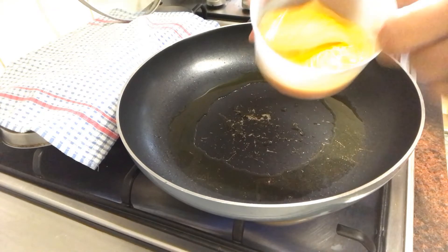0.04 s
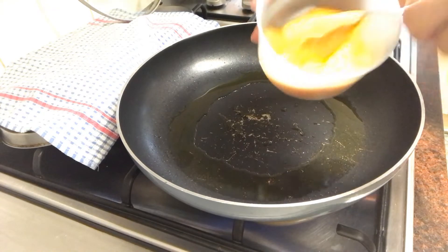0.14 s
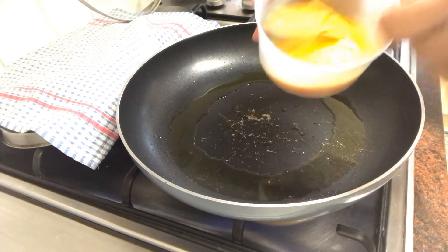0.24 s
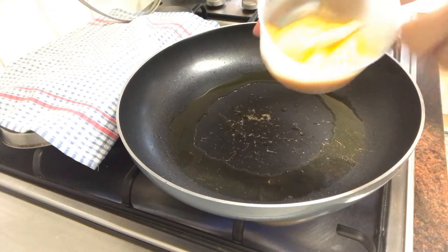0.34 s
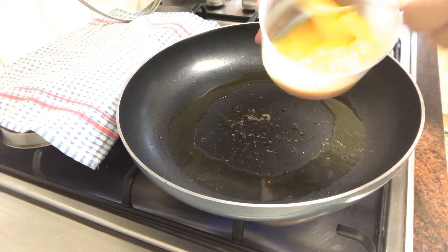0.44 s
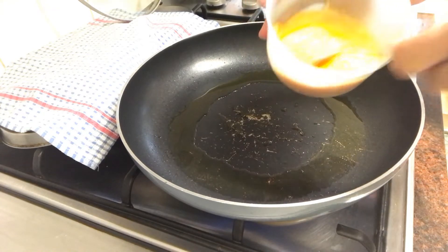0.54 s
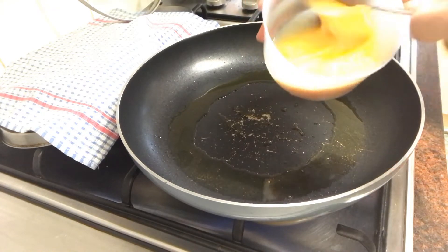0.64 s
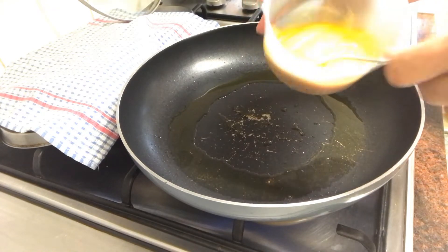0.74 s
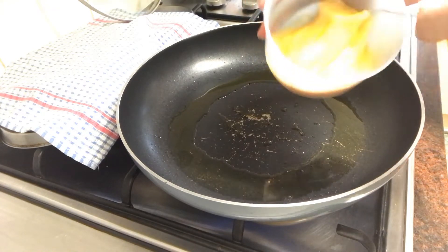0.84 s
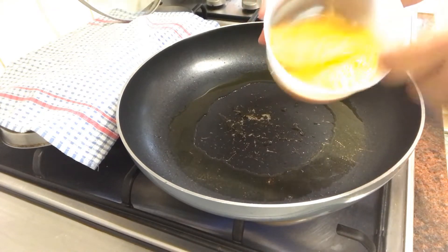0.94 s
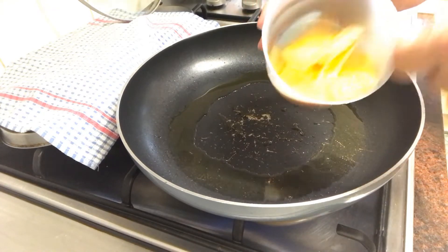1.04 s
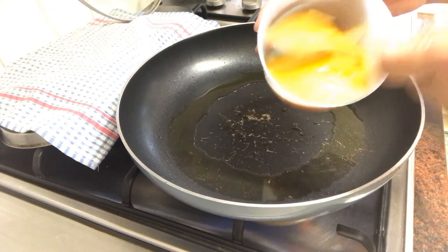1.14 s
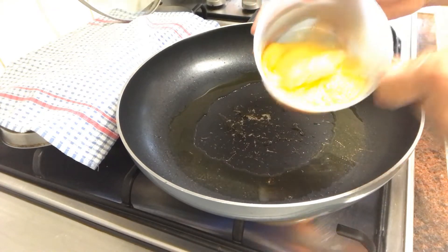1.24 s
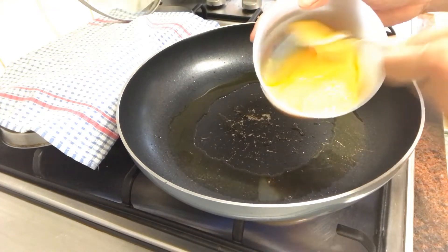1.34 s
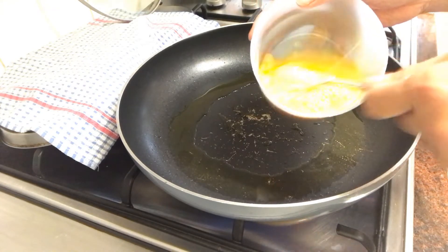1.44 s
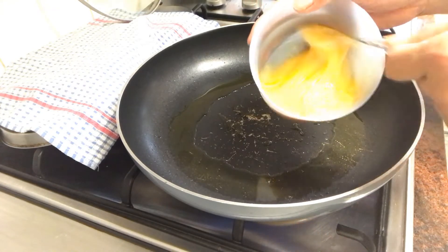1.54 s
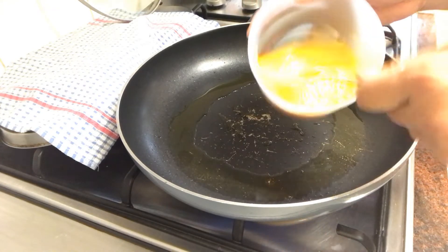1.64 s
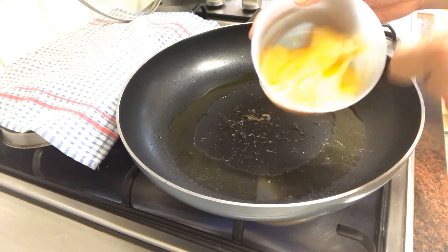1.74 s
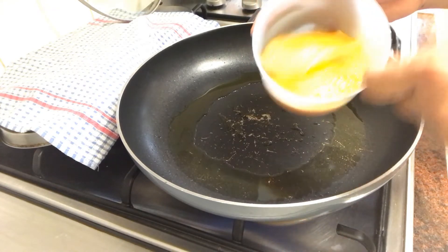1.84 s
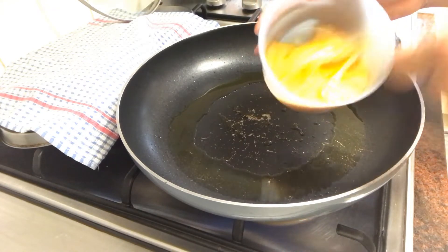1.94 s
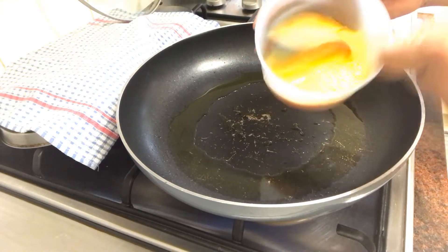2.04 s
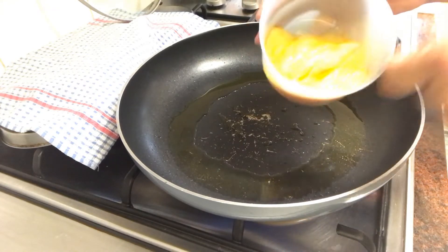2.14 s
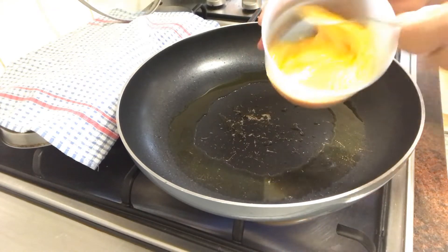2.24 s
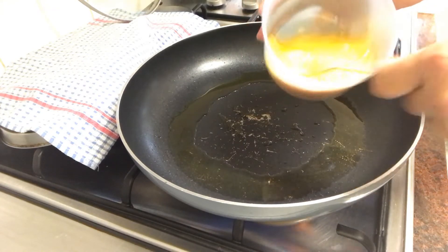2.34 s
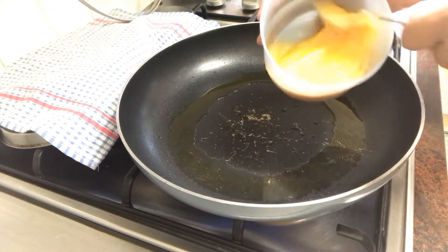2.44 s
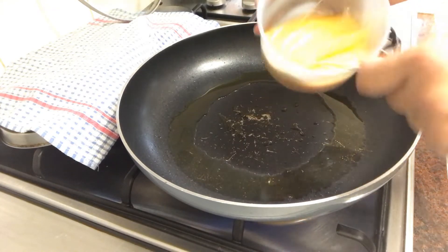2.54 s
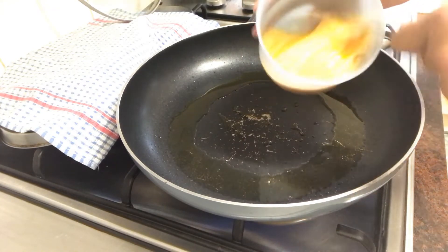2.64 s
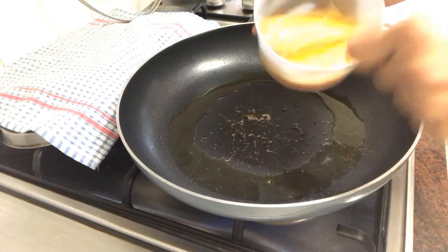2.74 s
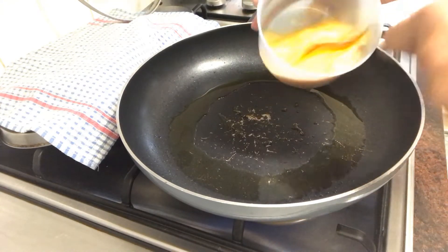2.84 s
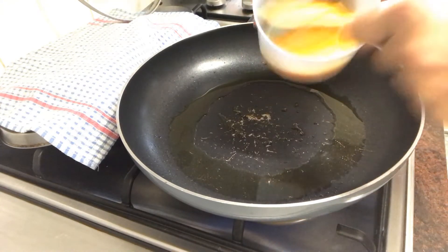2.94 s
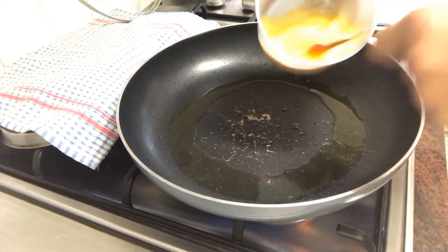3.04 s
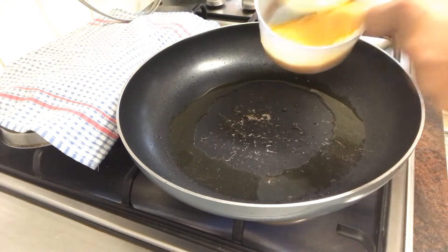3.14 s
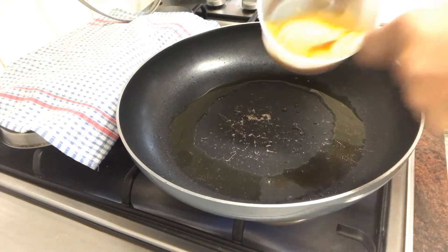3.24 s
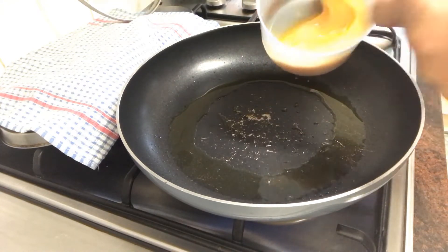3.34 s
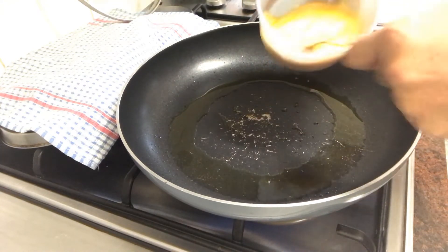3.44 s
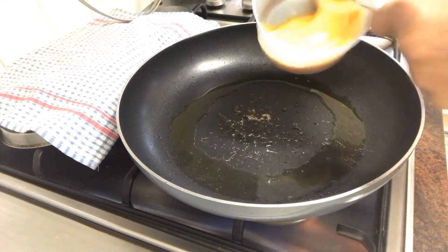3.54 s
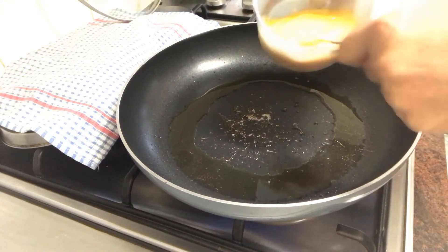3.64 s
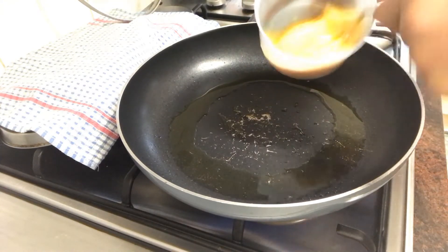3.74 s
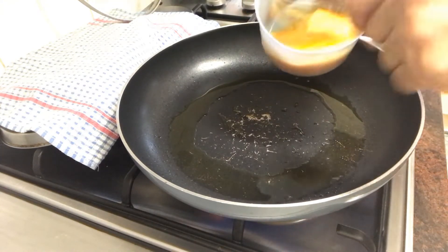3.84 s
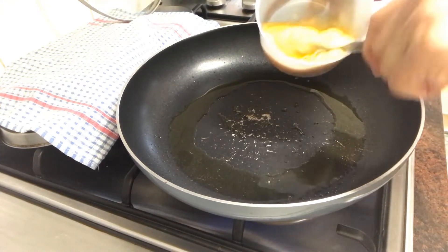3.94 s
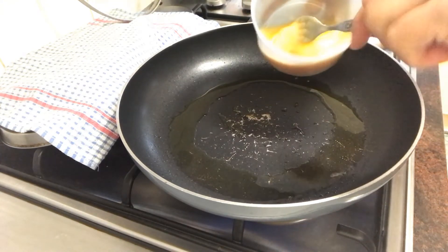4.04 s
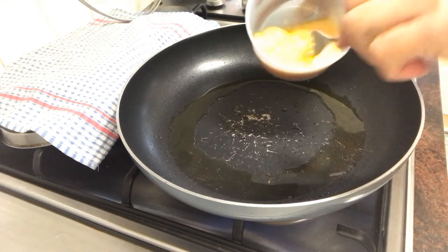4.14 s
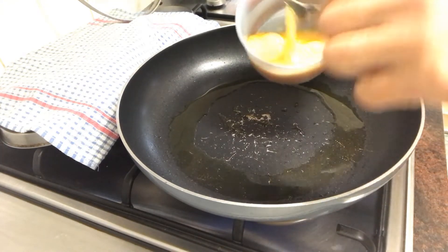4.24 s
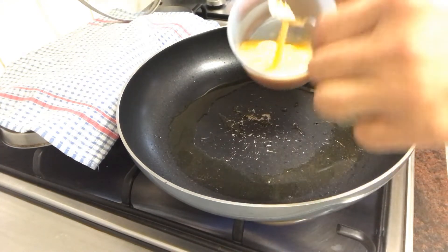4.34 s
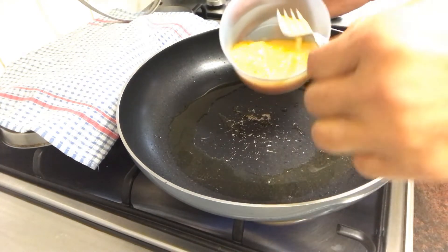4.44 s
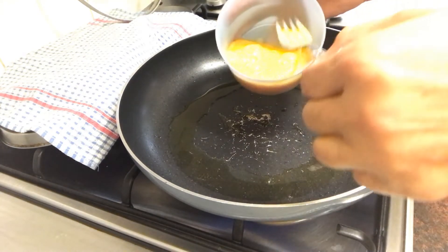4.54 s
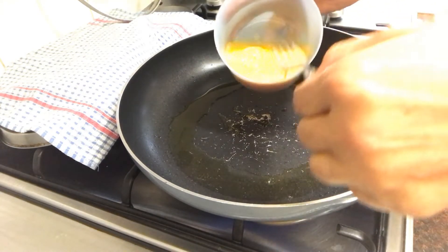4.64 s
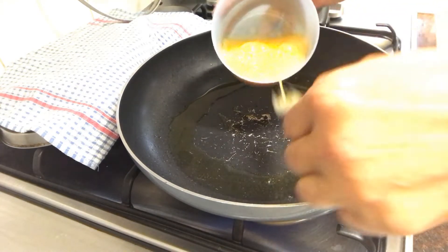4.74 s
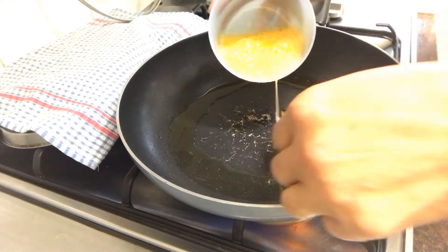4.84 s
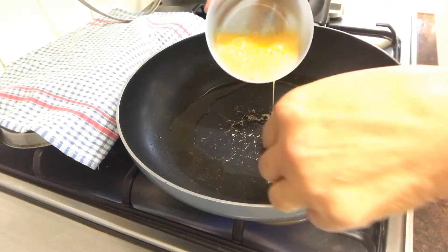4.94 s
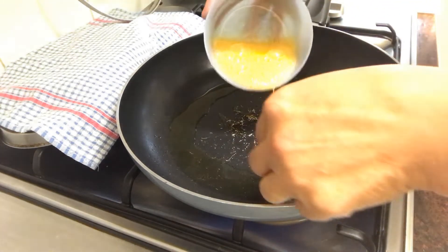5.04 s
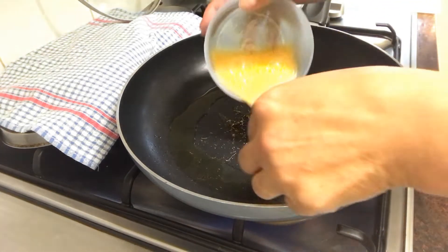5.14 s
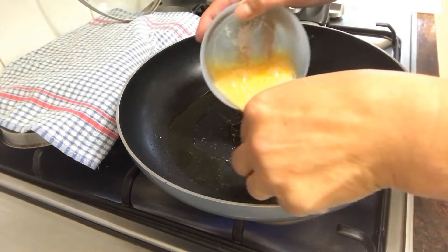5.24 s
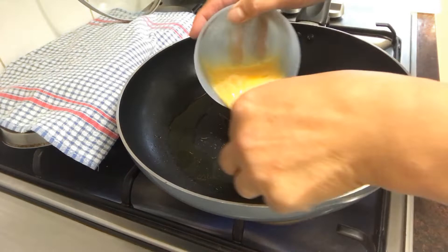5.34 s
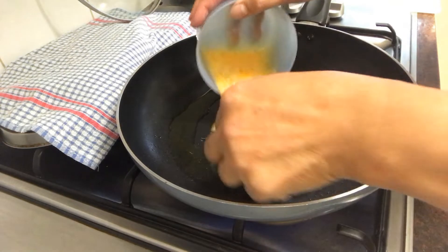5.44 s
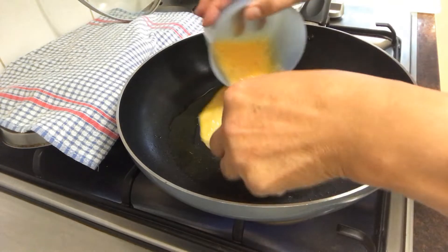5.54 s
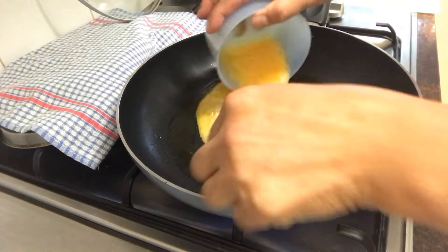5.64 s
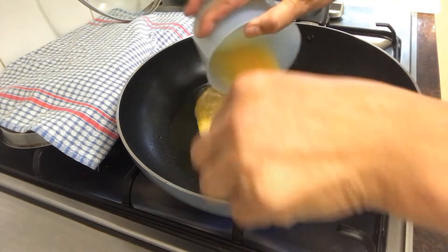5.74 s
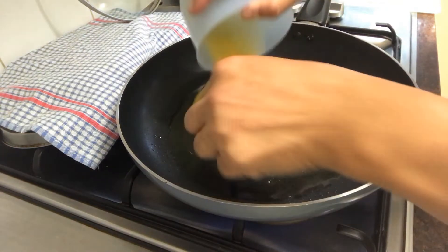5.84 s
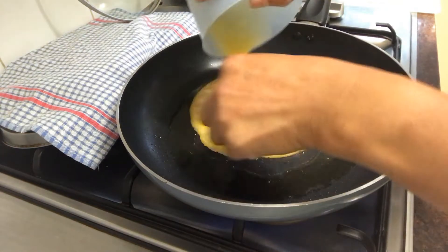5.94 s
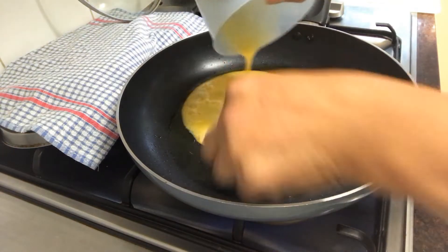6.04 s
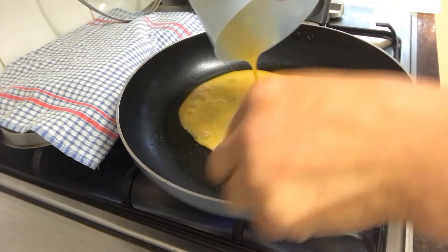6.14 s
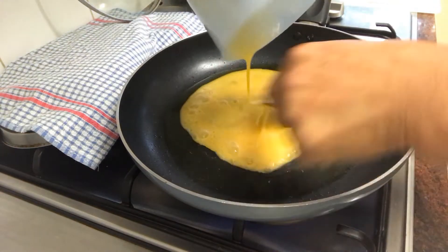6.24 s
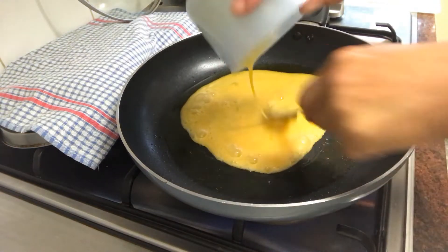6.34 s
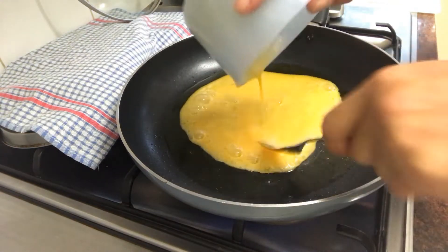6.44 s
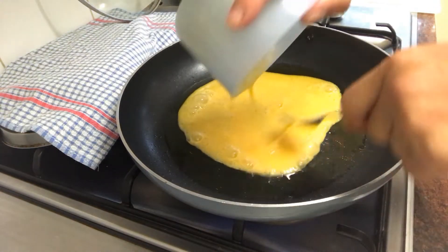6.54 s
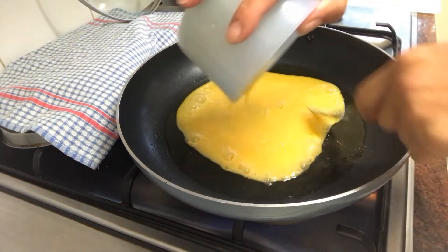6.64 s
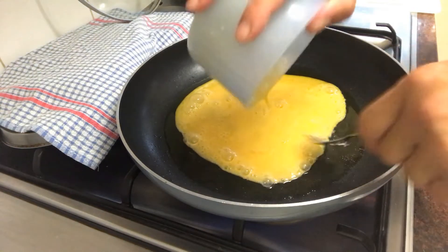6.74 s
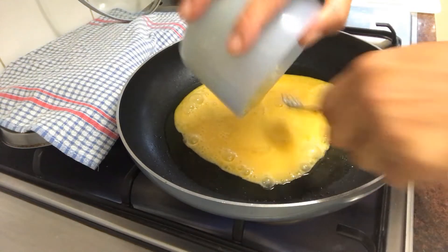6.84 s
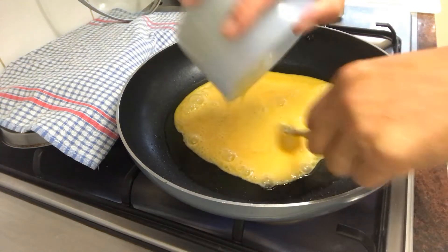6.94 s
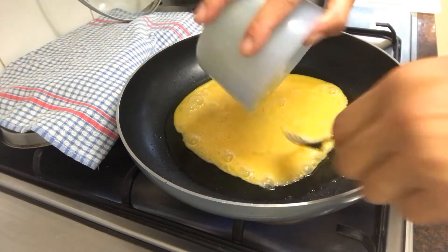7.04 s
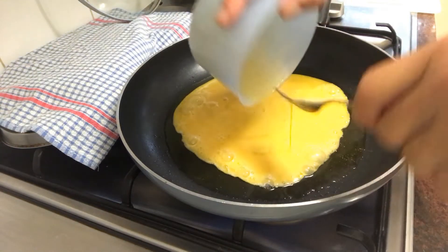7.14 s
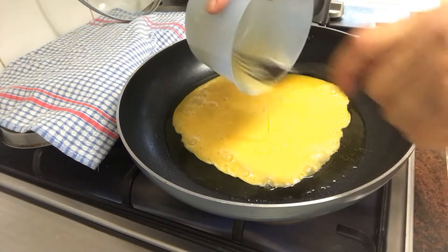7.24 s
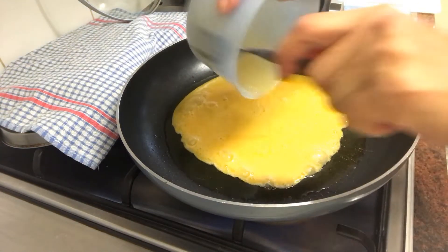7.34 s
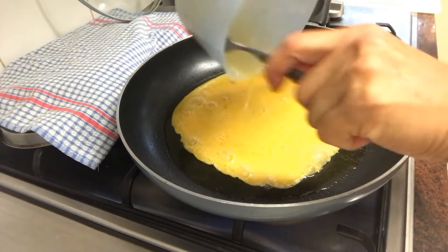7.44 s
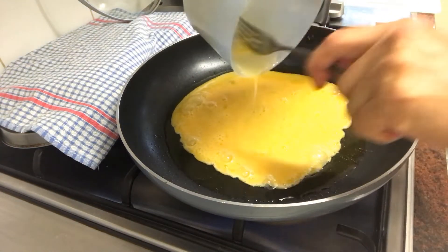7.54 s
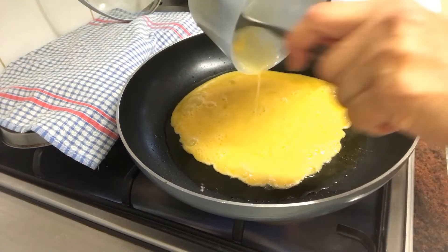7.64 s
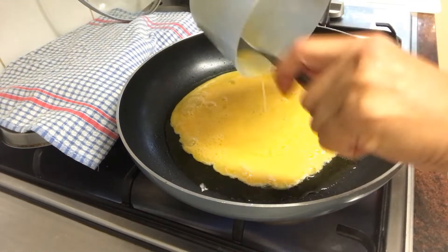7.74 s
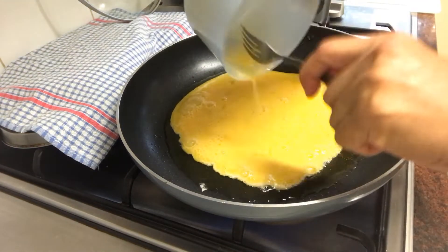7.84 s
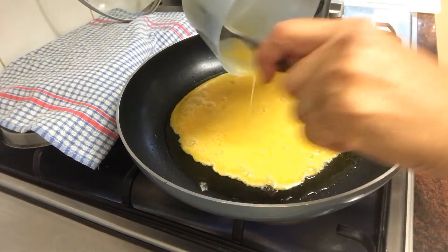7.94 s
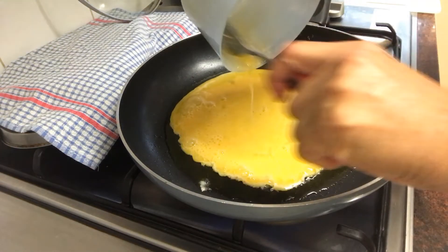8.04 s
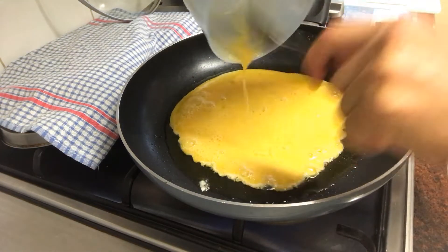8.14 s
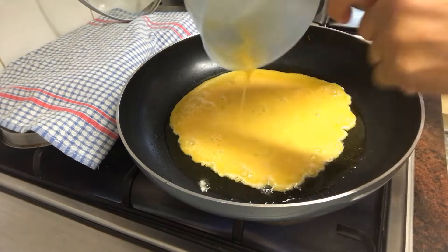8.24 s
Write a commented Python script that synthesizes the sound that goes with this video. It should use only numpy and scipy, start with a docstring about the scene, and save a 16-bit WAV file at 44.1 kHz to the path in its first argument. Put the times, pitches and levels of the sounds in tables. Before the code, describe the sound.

Brisk wet fork whisking knocks a small bowl for four seconds, a pause, then egg sputters in a hot pan, ending with bowl scrapes.

```python
"""A fork beats eggs in a thin bowl close to the microphone: noise slips, ringing wall modes and short gliding tones
make its knocks, scrapes and slosh, stroke by stroke.
A drip, then the whole egg, meets hot oil in a pan: random bubble rings, spits and whistles make the sizzle.
At last the fork scrapes the bowl out. A small kitchen answers with decaying noise echoes;
the gas flame and the house murmur below as soft coloured noise."""
import sys
import numpy as np
from scipy import signal
from scipy.fft import rfft, irfft
from scipy.io import wavfile

SR = 44100
rng = np.random.default_rng(int(sys.argv[2]) if len(sys.argv) > 2 else 0)


def put_to_file(sound):
    """Save the sound as 16-bit audio at rate SR, in the file named by the first command-line argument."""
    columns = np.atleast_2d(sound).T  # one column per channel
    safe = np.clip(columns, -1, 1)
    whole_steps = np.round(safe * 32767)
    wavfile.write(sys.argv[1], SR, whole_steps.astype(np.int16))


N = 365148   # samples

# modes of the bowl wall: pitch_hz, relative level_db, t60_s (stretched a little under sloshing egg)
BOWL_WALL = [(203.7, 2.5, 0.009), (333, -9.5, 0.0091), (627, -11.5, 0.025), (792, -8.5, 0.039),
             (939, -7, 0.05), (1120, -2.5, 0.026), (1550, 0, 0.014), (1830, -12.5, 0.025),
             (2110, -14, 0.035), (2390, -12.5, 0.053), (3000, -13.5, 0.048), (3330, -16, 0.034),
             (3620, -9.5, 0.04), (4300, -2.5, 0.011), (4700, -9.5, 0.01), (5324, -13, 0.04),
             (6090, -1.5, 0.0075), (6820, -3.5, 0.0082), (9130, -14.5, 0.018)]
# colour of tines dragging on the wall: frequency_hz, gain_db
SCRAPE_COLOUR = [(710, -27), (1200, 0), (1590, -20), (1870, -16), (2510, -5.5), (3180, -14), (6100, -11.5),
                 (7910, -22), (16000, -29.5)]
# a drip, then the pour, fry in the oil: time_s, small_bubbles_db, middle_bubbles_db, hiss_db (before mixing trims)
FRYING_LEVELS = [(4.96, -79, -84, -77), (5.012, -43.5, -58, -55), (5.25, -57.5, -61, -64.5),
                 (5.355, -56.5, -60, -70), (5.4, -33.5, -41, -50.5), (5.47, -27.5, -32, -48.5),
                 (5.66, -27.5, -31, -48.5), (5.82, -40, -32.5, -52.5), (5.99, -35, -35, -51),
                 (6.14, -43, -44.5, -56.5), (6.29, -35, -36, -47), (6.49, -32, -46, -58),
                 (6.82, -42.5, -50.5, -67.5), (7.1, -47, -50, -68.5), (7.6, -51.5, -54.5, -62.5),
                 (7.8, -46.5, -53, -59.5), (7.93, -63, -53.5, -67.5), (8.09, -46.5, -56, -62.5),
                 (8.28, -74, -53, -68.5)]
COMMON_HZ = 3400   # usual pitch of the commonest bubble


def amp(db):
    """Decibels to a linear factor."""
    return 10 ** (np.asarray(db) / 20)


def rms_one(x):
    """Scale to an rms of 1."""
    return x / np.sqrt(np.mean(x ** 2) + 1e-20)


def in_time(rows):
    """Columns joined by straight lines; silence before the first row."""
    s, *columns = np.transpose(rows)
    return [np.interp(np.arange(N) / SR, s, column, left=-200) for column in columns]


def colour(x, points):
    """Causal minimum-phase filter whose gain follows a table of frequency_hz, gain_db."""
    hz, db = np.transpose(points)
    grid = np.linspace(1, SR / 2, 1025)
    gain_db = np.interp(np.log(grid), np.log(hz), np.maximum(db, -70))
    cepstrum = irfft(gain_db * np.log(10) / 20)
    cepstrum[1:1024] *= 2      # folding the cepstrum gives minimum phase
    cepstrum[1025:] = 0
    impulse = irfft(np.exp(rfft(cepstrum)))
    return signal.oaconvolve(x, impulse)[:N]


def band(x, low_hz, high_hz, order=2):
    """Butterworth band-pass."""
    return signal.sosfilt(signal.butter(order, [low_hz, high_hz], "band", fs=SR, output="sos"), x)


def drift(rate):
    """Slow random wander of rms 1, made at SR / 40 and joined up; a higher rate (Hz) wanders faster."""
    r = np.exp(-80 * np.pi * rate / SR)
    noise = rng.standard_normal(N // 40 + 2002)
    slow = signal.lfilter([1], [1, -2 * r, r * r], noise)[2000:]   # drop the settling
    return np.interp(np.arange(N) / 40, np.arange(len(slow)), rms_one(slow))


def ring(clicks, hz, t60):
    """Two-pole resonance: a unit click sets a dying sine of height 1 ringing."""
    r, w = amp(-60 / (t60 * SR)), 2 * np.pi * hz / SR
    return signal.lfilter([0, np.sin(w)], [1, -2 * r * np.cos(w), r * r], clicks + 1e-18)


def grains(per_s, spread_db):
    """Random clicks of either sign, their sizes spread exponentially in dB."""
    sizes = amp(spread_db * np.minimum(rng.exponential(1, N), 5)) * rng.choice([-1, 1], N)
    return sizes * (rng.random(N) < per_s / SR)


def blips(rows, t60, rise_s, glide):
    """Short dying tones (time_s, level_db, pitch_hz), each gliding up as its pocket of air shrinks."""
    t = np.arange(SR // 20) / SR
    out = np.zeros(N + len(t))
    shape = (1 - np.exp(-t / rise_s)) * amp(-60 * t / t60)
    for s, db, hz in rows:
        at = round(s * SR)
        out[at:at + len(t)] += amp(db) * shape * np.sin(2 * np.pi * hz * t * (1 + glide * t))
    return out[:N]


def sing(x, hz, width_hz):
    """Resonance with a moving centre: shift down by the centre, low-pass twice, shift back; rms 1."""
    turn = np.exp(2j * np.pi * np.cumsum(hz) / SR)
    r = np.exp(-np.pi * width_hz / SR)
    return rms_one(np.real(turn * signal.lfilter([1], [1, -2 * r, r * r], x / turn)))


def dying_noise(clicks, noise, t60):
    """Each click opens a burst of noise that dies away exponentially."""
    envelope = signal.lfilter([1], [1, -amp(-60 / (t60 * SR))], clicks + 1e-18)
    return envelope * noise


def murmur():
    """Flame and house: soft noise whose bass comes in lumps."""
    # frequency_hz, gain_db
    murmur_colour = [(15, -45), (25, -29), (43, -12), (71, -6), (133, -13.5), (183, -14.5), (240, -19),
                     (389, -20.5), (440, -23.5), (520, -22), (1140, -20.5), (1530, -29), (7000, -37),
                     (9000, -42.5), (15500, -41)]
    noise = rms_one(colour(rng.standard_normal(N), murmur_colour))
    bass = signal.lfilter(*signal.butter(1, 200, fs=SR), noise)
    return amp(-64) * (noise - bass + amp(1.9 * drift(4.8)) * bass)


def sweep():
    """Slosh, scrape and squeak in dB and squelch pitch in Hz, shaped by how each stroke lands, slops and lifts."""
    # strokes along the wall: start_s, contact_s, egg_slops_after_s, slosh_db, scrape_db (before mixing trims),
    # squeak_on_landing_db, squelch_at_start_hz, squelch_at_slop_hz
    stroke_rows = [(0, 0.046, 0.0042, -34, -40.5, -1, 3700, 3600),
                   (.131, 0.087, .05, -23.5, -30.5, 1, 2600, 2000),
                   (0.302, 0.15, 0.076, -20, -27, 9.5, 4300, 2950),
                   (0.554, 0.096, 0.073, -24.5, -31, 0, 3100, 2450),
                   (0.745, 0.15, 0.042, -22.5, -29.5, 8, 3940, 2750),
                   (0.98, .11, 0.065, -25.5, -33, 15, 4560, 3100),
                   (1.118, 0.0062, 0.0076, -22, -33, 4, 3930, 3500),
                   (1.204, 0.2, 0.084, -25, -34.5, 20.5, 4500, 2330),
                   (1.427, .19, 0.092, -26, -31.5, 12, 4340, 2380),
                   (1.654, 0.18, 0.1, -25.5, -30.5, 5, 4300, 2800),
                   (1.911, .11, 0.069, -24, -27, -15, 3500, 2700),
                   (2.121, 0.15, 0.079, -23, -29, 10.5, 3300, 3000),
                   (2.336, 0.16, .08, -18.5, -30, -2, 4880, 2410),
                   (2.565, .13, 0.053, -17, -31, 5, 3100, 2600),
                   (2.787, 0.12, 0.074, -22, -29, -4, 5050, 2420),
                   (3.012, 0.1, 0.069, -16.5, -29, -2.5, 4850, 2620),
                   (3.25, 0.11, 0.049, -18, -30, -1.5, 3370, 2300),
                   (3.449, 0.11, 0.078, -18.5, -29.5, -1, 4470, 2470),
                   (3.675, 0.089, .06, -16, -28.5, -0.5, 3370, 2850),
                   (3.94, 0.0068, 0.0067, -16, -34.5, 4.5, 3400, 2600),
                   (7.365, 0.044, 0.1, -22, -37, 3, 4020, 3000),
                   (7.468, 0.064, .03, -32, -36, 7, 3900, 3400),
                   (7.702, 0.0058, 0.0056, -23, -34, 0, 4700, 4600),
                   (7.764, 0.038, 0.0076, -23.5, -33, 4, 3000, 2830),
                   (7.982, 0.022, .005, -33, -39, 0, 3620, 3600),
                   (8.04, 0.084, 0.077, -32, -37.5, 15, 3120, 3070)]
    attack_s, bite_db, bite_s = 0.0033, 11, 0.011   # the tines land fast and bite harder at first
    drag_db_per_s, lift_db_per_s = 29.5, 328        # the scrape eases in contact, dies after the lift
    # the slosh swells to the slop, ebbs, drains after the lift
    swell_db_per_s, ebb_db_per_s, drain_db_per_s = 200.5, 135, 306
    drip_db, drip_db_per_s = -20, 108.5             # egg runs back down the wall, this far under the slosh
    squeak_s = 0.05                                 # the squelch stands out while the tines dig in
    gulp_db, gulp_s = 3.5, 0.02                     # and again as the egg slops
    lift_hz = 3500.                                 # the squelch returns to this as the fork leaves

    slosh_db, scrape_db = np.full((2, N), -200.)
    squeak_db, sing_hz = np.zeros(N), np.full(N, lift_hz)
    for start_s, contact_s, slop_s, top_db, drag_db, dig_db, first_hz, slop_hz in stroke_rows:
        start = round(start_s * SR)
        at = slice(start, min(start + SR // 2, N))
        t = np.arange(at.stop - at.start) / SR
        landing_db = 20 * np.log10(np.minimum(t / attack_s, 1) + 1e-9)
        lifted_s = np.maximum(t - contact_s, 0)
        scrape = drag_db + bite_db * np.exp(-t / bite_s) - drag_db_per_s * t - lift_db_per_s * lifted_s
        fall_db = np.maximum(swell_db_per_s * (slop_s - t), ebb_db_per_s * (t - slop_s))
        slosh = top_db - fall_db - drain_db_per_s * lifted_s
        slosh = np.maximum(slosh, top_db + drip_db - drip_db_per_s * np.abs(t - contact_s))
        scrape_db[at] = np.maximum(scrape_db[at], scrape + landing_db)
        slosh_db[at] = np.maximum(slosh_db[at], slosh + landing_db)
        dig = dig_db * np.exp(-(t / squeak_s) ** 2)
        squeak_db[at] = dig + gulp_db * np.exp(-((t - slop_s) / gulp_s) ** 2)
        turns_s = [0, slop_s / 4, slop_s, max(contact_s, slop_s) + 0.033]
        sing_hz[at] = np.interp(t, turns_s, [first_hz, first_hz, slop_hz, lift_hz])
    return slosh_db, scrape_db, squeak_db, sing_hz


def strokes(slosh_db, scrape_db, squeak_db, sing_hz):
    """Dense slips of the tines hiss and sing with the wet spot; sloshing egg shakes the low modes and pops."""
    # pockets of air pop in the egg: time_s, level_db, pitch_hz
    pop_rows = [(0.1596, -15, 1820), (0.1838, -18, 2990), (0.2503, -26.5, 1540), (0.408, -21.5, 1900),
                (0.6344, -17.5, 2120), (0.854, -26, 3540), (1.3029, -22, 2300), (1.3159, -14, 2050),
                (1.365, -22, 3100), (1.54, -14.5, 2300), (1.5544, -22, 1620), (1.5763, -19, 3840),
                (1.6064, -28, 1550), (1.6781, -24, 2110), (1.7606, -22.5, 1540), (2.0144, -23.5, 3460),
                (2.2694, -23, 3330), (2.421, -19, 1780), (2.438, -25, 1790), (2.5994, -19, 2025),
                (2.6528, -15, 1560), (2.689, -28, 2460), (2.8494, -16, 1560), (2.8638, -28.5, 2480),
                (3.0405, -36, 1680), (3.0656, -22, 1600), (3.0924, -33, 1590), (3.3444, -19.5, 2100),
                (3.385, -32, 3100), (3.515, -20, 1540), (3.5332, -18.5, 1600), (3.7438, -16.5, 1570),
                (8.0586, -30, 3180)]
    slips = grains(2500, spread_db=1.5) * amp(4.76 * drift(48))
    squelch = amp(3.5 * drift(30)) * sing(slips, sing_hz, width_hz=700)
    overtone = amp(4 * drift(20) - 7) * sing(slips, 1.55 * sing_hz, width_hz=800)
    hiss = amp(-5) * rms_one(colour(slips, SCRAPE_COLOUR))
    scrape = hiss + amp(-17.5) * (amp(squeak_db) * squelch + overtone)

    lumps = grains(700, spread_db=2.5) * amp(2.5 * drift(60))
    slosh = np.zeros(N)
    for k, (hz, db, t60) in enumerate(BOWL_WALL[1:8]):
        slosh += amp(db) * ring(lumps, hz, 1.1 * t60) * (-1) ** k
    glop_hz = 1150 * 2 ** (0.22 * drift(21.7))   # pockets of air in the egg change size
    glop = sing(lumps, glop_hz, width_hz=373)
    pops = blips(pop_rows, t60=0.025, rise_s=0.0012, glide=1.1)
    return amp(slosh_db - 14) * (rms_one(slosh) + glop) + amp(scrape_db) * scrape + pops


def kitchen(x):
    """Room answer: dense, dulled noise echoes that die away, starting 4 ms after the sound."""
    t60_s, level_db, cut_hz = 0.24, -15, 7600
    t = np.arange(SR // 2) / SR
    echoes = rng.standard_normal(len(t)) * amp(-60 * t / t60_s) * (t > 0.004)
    echoes = signal.lfilter(*signal.butter(1, cut_hz, fs=SR), echoes)
    return amp(level_db) * signal.oaconvolve(x, echoes / np.linalg.norm(echoes))[:N]


def knocks(sing_hz):
    """Tines hit the bowl: steel tick, wall modes at fresh strengths, clink at the wet spot, thud of the hollow."""
    # time_s, thud_db, hollow_pitch_hz, wall_db, tick_db, thump_db (levels before mixing trims)
    knock_rows = [(0.12, -27.5, 1280, -48, -32, -33), (0.134, -7, 1175, -21, -30, -35),
                  (0.182, -23, 977, -17, -26, -56), (0.302, -23, 1020, -25, -30, -35),
                  (0.342, -15, 1056, -45, -44, -48), (0.44, -31, 1000, -16.5, -14.5, -54),
                  (0.457, -22, 1060, -14.5, -22.5, -58), (0.554, -23.5, 850, -24, -24, -52),
                  (0.573, -12.5, 1120, -43, -28, -48), (0.611, -22, 985, -32, -48, -56),
                  (0.624, -14, 960, -24, -33, -38), (0.65, -12.5, 1257, -14.5, -24.5, -54),
                  (0.683, -13.5, 786, -17, -24, -46), (0.751, -14.5, 1067, -20, -20.5, -49),
                  (0.81, -15, 1177, -52, -38, -47), (0.837, -22.5, 1210, -57, -71, -65),
                  (0.896, -29, 1530, -18, -22.5, -54), (0.924, -10.5, 860, -23, -19.5, -55),
                  (0.983, -21, 982, -30, -26, -59), (1.013, -19.5, 964, -71, -19.5, -50),
                  (1.032, -21, 1110, -70, -44, -52), (1.06, -16.5, 1070, -39, -52, -63),
                  (1.12, -17, 1170, -16, -18.5, -21), (1.203, -23.5, 1080, -28, -35, -47),
                  (1.216, -30, 1140, -32, -41, -60), (1.265, -16, 1030, -45, -50, -52),
                  (1.276, -12.5, 1000, -33, -24, -49), (1.32, -15, 1080, -15.5, -20.5, -36),
                  (1.344, -20, 1080, -22, -31, -54), (1.428, -36, 1400, -33, -53, -50),
                  (1.438, -42, 1010, -23, -44, -58), (1.474, -16, 940, -18.5, -29, -53),
                  (1.498, -18, 1620, -40, -25.5, -52), (1.52, -19.5, 1114, -32, -40, -61),
                  (1.538, -16.5, 1385, -20, -28, -53), (1.575, -22, 1160, -21.5, -38, -48),
                  (1.602, -24, 1550, -21, -33, -65), (1.659, -26, 1114, -40, -31, -53),
                  (1.706, -14, 957, -40, -50, -48), (1.722, -14, 990, -28, -36, -48),
                  (1.814, -38, 905, -15, -22.5, -61), (1.913, -39, 1055, -38, -33, -59),
                  (1.92, -11.5, 944, -43, -80, -52), (1.942, -15.5, 1113, -27, -39, -48),
                  (2.011, -19.5, 890, -15, -21, -48), (2.063, -31, 1090, -23.5, -32.5, -67),
                  (2.123, -23, 1060, -28.5, -19.5, -44), (2.15, -10.5, 936, -39, -36, -52),
                  (2.173, -19.5, 1150, -14, -36.5, -45), (2.208, -19, 1120, -32, -24.5, -56),
                  (2.244, -26, 1560, -20, -23.5, -55), (2.341, -16.5, 1000, -49, -26, -61),
                  (2.381, -15.5, 970, -18, -25, -59), (2.418, -13.5, 1240, -25, -34.5, -52),
                  (2.478, -36.5, 1020, -12, -24, -55), (2.568, -32.5, 1090, -38, -25, -48),
                  (2.582, -34.5, 1140, -11, -25.5, -49), (2.598, -18, 1030, -26, -20.5, -49),
                  (2.651, -13, 1190, -27, -30.5, -51.5), (2.664, -20.5, 985, -40, -65, -49.5),
                  (2.716, -41, 1100, -22.5, -39, -69), (2.793, -30.5, 1090, -69, -22.5, -32),
                  (2.826, -11.5, 960, -31, -28, -44.5), (2.832, -8, 1036, -39, -38.5, -52),
                  (2.863, -16, 1245, -26, -40, -56), (2.874, -21, 970, -51, -34, -51),
                  (2.9, -15.5, 1000, -33, -38, -49.5), (2.936, -50.5, 956, -25, -32, -64),
                  (3.012, -22.5, 985, -50, -19.5, -51), (3.032, -18, 1200, -17, -36.5, -46),
                  (3.041, -19, 950, -22, -26, -34), (3.064, -16, 1130, -37, -36.5, -32.5),
                  (3.093, -18.5, 1240, -33, -42, -53), (3.113, -16, 986, -43, -49.5, -57),
                  (3.245, -39, 1140, -28, -33.5, -44), (3.255, -14, 1086, -17.5, -19, -46),
                  (3.276, -11, 1124, -53, -46.5, -52), (3.308, -20.5, 1030, -49, -24.5, -49),
                  (3.35, -30, 1110, -22, -40.5, -56), (3.455, -15, 1130, -37, -35, -47.5),
                  (3.482, -11, 1005, -18, -27.5, -49), (3.497, -34, 1130, -30.5, -34, -42),
                  (3.532, -12.5, 1040, -16.5, -29, -46), (3.678, -40, 1060, -25.5, -25, -46),
                  (3.698, -13.5, 1076, -20, -23.5, -35), (3.735, -29, 950, -19, -30, -53),
                  (3.933, -23.5, 916, -36, -49, -26), (3.943, -11, 1020, -21, -26, -22.5),
                  (4.323, -67, 1180, -55, -43.5, -69), (4.514, -61, 724, -71, -75, -63.5),
                  (4.587, -67, 1220, -57, -61, -58), (7.342, -49, 1490, -40, -45, -50),
                  (7.368, -28, 950, -14.5, -17, -37), (7.406, -12, 1037, -17, -18, -16),
                  (7.7, -15, 920, -15.5, -9, -55), (7.737, -28, 1000, -40, -32, -44),
                  (7.771, -12, 994, -31, -50, -50), (7.778, -14.5, 970, -30, -41, -50),
                  (7.982, -15.5, 906, -13.5, -12, -39), (8.003, -20.5, 930, -39, -26, -60)]
    # how hard thump, thud, wall and tick drive their share of the wall modes: four drives_db
    mode_drive_db = (-0.5, -11, -3.5, -2)
    s, thud_db, hollow_hz, wall_db, tick_db, thump_db = np.transpose(knock_rows)
    at = np.round(s * SR).astype(int)
    chance = rng.standard_normal((len(s), len(BOWL_WALL)))
    modes, tick = np.zeros(N), np.zeros(N)
    for k, (hz, db, t60) in enumerate(BOWL_WALL):
        clicks = np.zeros(N)
        part = np.searchsorted([500, 1600, 4200], hz)   # thump lowest, then thud, wall, tick
        force_db = (thump_db, thud_db, wall_db, tick_db)[part] + mode_drive_db[part]
        clicks[at] = amp(force_db + db + 1.37 * chance[:, k]) * np.sign(chance[:, k - 1])
        modes += ring(clicks, hz, t60)
    tick[at] = amp(tick_db)
    # a bright snap over a slightly longer burst of scrape-coloured noise
    snap = dying_noise(tick, rng.standard_normal(N), t60=0.011)
    snap = amp(-4.5) * band(snap, 4200, 20000)
    burst = dying_noise(tick, colour(rng.standard_normal(N), SCRAPE_COLOUR), t60=0.017)
    thud = blips(zip(s, thud_db, hollow_hz), t60=0.025, rise_s=0.0018, glide=0.49)
    clink = blips(zip(s, wall_db, sing_hz[at]), t60=0.02, rise_s=0.0012, glide=0.3)
    return modes + snap + amp(12) * burst + amp(3) * thud + amp(-6.5) * clink


def frying():
    """Levels in dB of big, middle and small bubbles and hiss, and the commonest bubble's pitch in Hz."""
    # big bubbles start where egg lands and thin out: lands_s, builds_up_over_s, level_db, fade_db_per_s
    landing_rows = [(4.975, .04, -51, 67), (5.37, 0.096, -43.5, 3.5)]
    # the hiss flares and the commonest bubble's pitch jumps up: time_s, hiss_db, decay_s
    flare_rows = [(5.99, -61, 0.027), (6.3, -51, 0.14), (6.983, -58, 0.023)]
    flare_hz = 5100
    small_db, middle_db, hiss_db = in_time(FRYING_LEVELS)
    t, big, hiss, flaring = np.arange(N) / SR, 1e-10, amp(hiss_db), 0
    for lands_s, builds_s, db, fade_db in landing_rows:
        build = np.clip((t - lands_s) / builds_s, 0, 1) ** 2
        big = big + build * amp(db - fade_db * np.maximum(t - lands_s, 0))
    for s, db, decay_s in flare_rows:
        flare = (t > s) * np.exp(-np.maximum(t - s, 0) / decay_s)
        hiss = hiss + amp(db) * flare
        flaring = flaring + flare
    common_hz = COMMON_HZ + (flare_hz - COMMON_HZ) * flaring
    return 20 * np.log10(big), middle_db, small_db, 20 * np.log10(hiss), common_hz


def bubbles(low_hz, high_hz, per_s, cycles, spread_db):
    """Steam bubbles burst at random and ring a few cycles, their pitches spread over a range; rms 1."""
    # colour of the frying: frequency_hz, gain_db
    fry_colour = [(180, -78), (300, -3), (528, -25.5), (593, -2), (801, -15), (994, -6.5), (1510, -1),
                  (1690, -1), (2320, -4.5), (3030, -3), (4440, 1.5), (6740, -4.5), (10400, -19.5),
                  (14700, -13.5), (16000, -18)]
    bursts = grains(per_s * amp(2.5 * drift(20)), spread_db)
    dealt = rng.integers(0, 8, N)   # which of eight pitches each burst takes
    rings = np.zeros(N)
    for k, hz in enumerate(np.geomspace(low_hz, high_hz, 8)):
        rings += ring(bursts * (dealt == k), hz, cycles / hz) * np.sqrt(hz)
    return rms_one(band(colour(rings, fry_colour), 0.86 * low_hz, min(1.6 * high_hz, 20000)))


def pan_modes(big_db, middle_db, small_db):
    """Noise rings the pan's modes, each as loud as the bubbles in its range."""
    # pitch_hz, relative level_db, t60_s
    pan_rows = [(581, -13, 0.092), (820, 3, 0.069), (1550, -6.5, 0.048), (2174, -2.5, 0.12),
                (3000, -4.5, 0.055), (3500, -1.5, 0.0073), (4290, -8, 0.11)]
    out = np.zeros(N)
    for hz, db, t60 in pan_rows:
        drive_db = big_db if hz < 1250 else middle_db if hz < 2200 else small_db
        mode = rms_one(ring(rng.standard_normal(N), hz, t60))
        out += amp(db + 2.6 * drift(16)) * mode * amp(drive_db)
    return out


def loud_spits():
    """The loudest spits of fat: a gliding tone with a bright crack of noise."""
    # time_s, tone_db, pitch_hz, crack_db (levels before mixing trims)
    spit_rows = [(5.012, -19.5, 3350, -34), (5.0544, -29, 4330, -35), (5.1214, -28, 3420, -39),
                 (5.149, -25, 3620, -35), (5.226, -32, 5270, -37.5), (5.2729, -27, 4300, -35),
                 (5.3275, -35, 3660, -36), (5.4834, -13, 2970, -41), (5.5246, -11, 3220, -31),
                 (5.5434, -5.5, 3700, -40), (5.5694, -9, 4230, -45), (5.991, -26, 3320, -24.5),
                 (6.1994, -19, 3720, -51), (6.2794, -13.5, 5770, -48), (6.3785, -15, 4580, -43),
                 (6.412, -14, 3230, -46), (6.4973, -6, 3600, -36), (6.611, -16, 3460, -52),
                 (6.6464, -13.5, 3330, -49), (6.6743, -9.5, 3370, -57), (6.7497, -13.5, 3450, -54),
                 (6.838, -20, 3150, -51), (6.8576, -22, 3200, -62), (6.9773, -20, 6080, -28.5),
                 (7.0956, -16.5, 3190, -57), (7.1332, -28, 3270, -64), (7.3028, -33, 3730, -42),
                 (7.553, -19.5, 3240, -55)]
    s, tone_db, hz, crack_db = np.transpose(spit_rows)
    crack = np.zeros(N)
    crack[np.round(s * SR).astype(int)] = amp(crack_db)
    crack = dying_noise(crack, rng.standard_normal(N), t60=0.02)
    tones = blips(zip(s, tone_db, hz), t60=0.026, rise_s=0.00022, glide=0.83)
    return amp(-11) * tones + amp(-2) * band(crack, 5000, 19000)


def stray_spits(small_db):
    """Smaller, sharper spits at random through the frying, their level following the small bubbles."""
    count, above_small_db, top_db, spread_db = 330, 15, -23, 5
    where, size, pitch = rng.random((count, 3)).T
    first_s = FRYING_LEVELS[0][0]
    s = first_s + where * (N / SR - first_s)
    level_db = np.minimum(small_db[(s * SR).astype(int)] + above_small_db, top_db)
    level_db = level_db + spread_db * np.log(size + 1e-3)
    hz = COMMON_HZ * 2 ** (0.45 * pitch - 0.2)
    return blips(zip(s, level_db, hz), t60=0.005, rise_s=0.0001, glide=2.5)


def whistles():
    """Steam squeezing out under the egg: narrow, unsteady tones of ringing noise that swell and fade."""
    # start_s, end_s, pitch_hz, level_db
    whistle_rows = [(5.02, 5.39, 2447, -63), (5.08, 5.36, 1478, -70), (5.36, 5.466, 2275, -41.5),
                    (5.4, 5.434, 5450, -37.5), (5.45, 5.523, 3000, -32), (5.47, 5.617, 4290, -39),
                    (5.56, 5.707, 1550, -38.5), (5.72, 5.925, 1542, -42), (6.21, 6.276, 1550, -39),
                    (6.49, 6.6, 3524, -39.5)]
    out = np.zeros(N)
    for start_s, end_s, hz, db in whistle_rows:
        a, b = round(start_s * SR), round(end_s * SR)
        tone = ring(rng.standard_normal(b - a), hz, 1.5 * (end_s - start_s))   # the longer, the steadier
        out[a:b] += amp(db) * signal.windows.tukey(b - a, 0.2) * rms_one(tone)
    return out


def sizzle():
    """Four sizes of bubble, the commonest size standing out, the singing pan, spits of fat and whistles."""
    big_db, middle_db, small_db, hiss_db, common_hz = frying()
    big = amp(big_db - 3) * bubbles(467, 1530, 1500, cycles=12.6, spread_db=4)
    middle = amp(middle_db - 3) * bubbles(1130, 3160, 2500, cycles=3.7, spread_db=-0.5)
    small = amp(small_db - 5) * bubbles(2055, 6250, 4000, cycles=33, spread_db=-1)
    common = amp(small_db - 10.5) * sing(grains(400, spread_db=-0.5), common_hz, width_hz=2200)
    hiss = amp(hiss_db + 8) * bubbles(7000, 19000, 9000, cycles=3, spread_db=2.5)
    pan = amp(-13) * pan_modes(big_db, middle_db, small_db)
    spits = loud_spits() + stray_spits(small_db)
    return big + middle + small + common + hiss + pan + spits + whistles()


def scene():
    """Bowl and pan close by, the kitchen's answer around them, the murmur beneath."""
    *levels, sing_hz = sweep()
    near = knocks(sing_hz) + strokes(*levels, sing_hz) + sizzle()
    # small things radiate no bass
    near = signal.sosfilt(signal.butter(2, 220, "high", fs=SR, output="sos"), near)
    return (near + kitchen(near) + murmur())[None]


def record(dry):
    """The microphone signal loses its top: a steep low-pass at 15.8 kHz."""
    return signal.sosfilt(signal.ellip(10, 0.5, 70, 15800, fs=SR, output="sos"), dry)


dry = scene()
out = record(dry)
put_to_file(out)
```